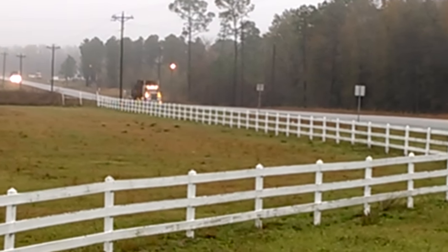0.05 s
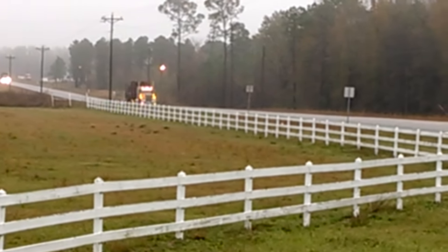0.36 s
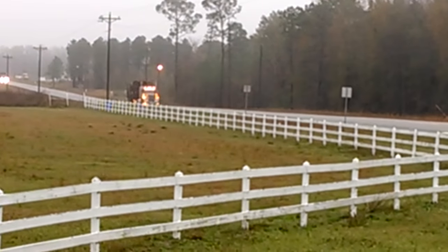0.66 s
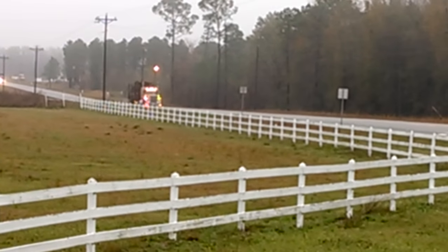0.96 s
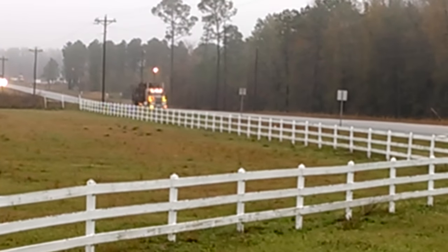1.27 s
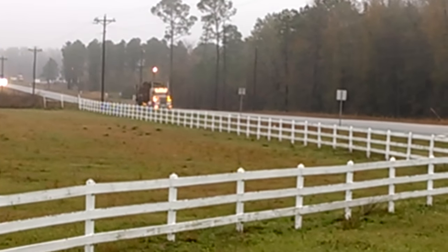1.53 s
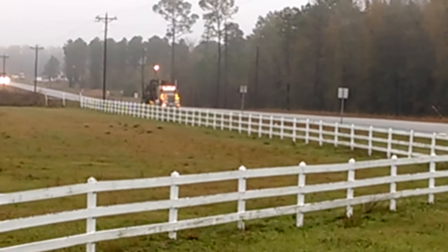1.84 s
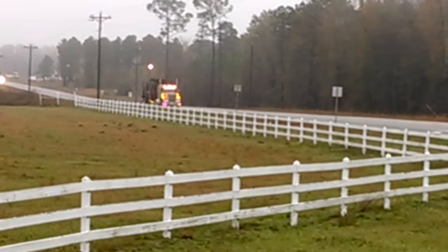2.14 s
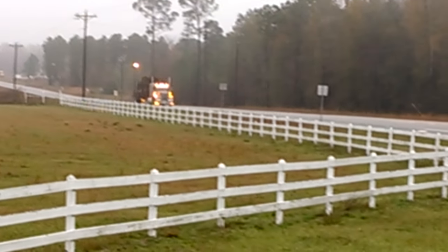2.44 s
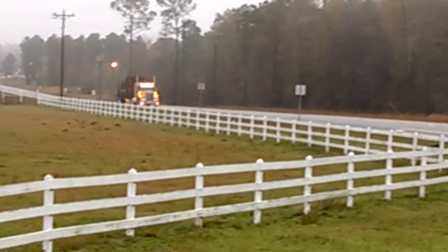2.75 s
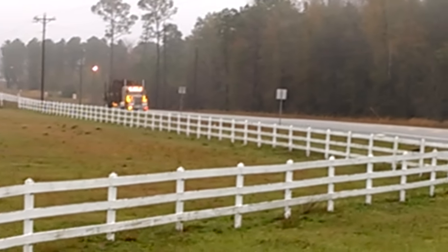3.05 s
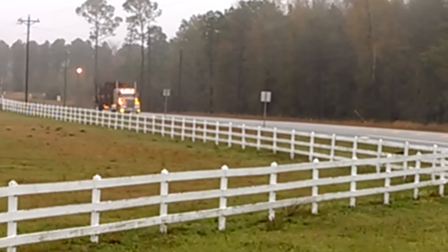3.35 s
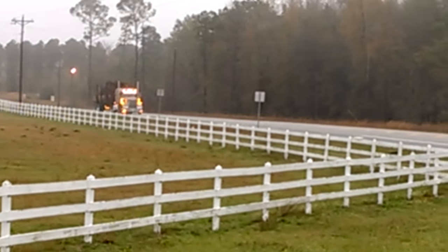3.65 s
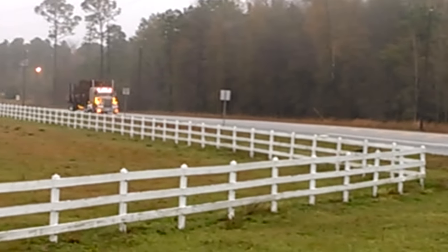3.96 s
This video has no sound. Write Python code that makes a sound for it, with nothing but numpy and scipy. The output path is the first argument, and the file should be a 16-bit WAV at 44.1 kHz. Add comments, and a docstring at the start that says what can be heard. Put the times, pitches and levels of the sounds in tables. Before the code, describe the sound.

A heavy truck's engine brake rattles in the distance, pauses for a rev, then resumes faster.

```python
"""A heavy truck's engine brake, heard across a field as it comes down a country road.
Six cylinders dump their air unevenly through two exhaust stacks; a few cracks carry a bright snap, and
the tree line echoes the exhaust. The brake lets go, the engine is revved for a downshift with a faint
turbo whistle, and the brake bites again, faster. Beneath it: the boom of the firing rate, tyres,
light wind, hiss and faint ticks."""
import sys
import numpy as np
from scipy import signal
from scipy.fft import rfft, irfft
from scipy.io import wavfile
from scipy.ndimage import uniform_filter1d, minimum_filter1d

SR = 44100
rng = np.random.default_rng(int(sys.argv[2]) if len(sys.argv) > 2 else 0)


def master(y):
    """Save y as 16-bit WAV."""
    cut = np.clip(np.atleast_2d(y).T, -1, 1)
    pcm = np.round(cut * 32767)  # scale
    wavfile.write(sys.argv[1], SR, pcm.astype(np.int16))


N = 176400
T = np.arange(N) / SR
HZ = np.fft.rfftfreq(N, 1 / SR)


def amp(db):
    """Decibels to gain."""
    return 10 ** (np.asarray(db) / 20)


def unit(x):
    """Scale to rms 1."""
    return x / np.sqrt(np.mean(x ** 2) + 1e-20)


def curve(rows, column=1):
    """One column of a time table, per sample."""
    rows = np.array(rows)
    return np.interp(T, rows[:, 0], rows[:, column])


def spectrum(rows, hz):
    """Interpolate a table over log frequency."""
    row_hz, value = np.transpose(rows)
    return np.interp(np.log(hz + 1), np.log(row_hz + 1), value)


def band(x, low_hz, high_hz):
    """Steep band-pass."""
    loss = (1 + (low_hz / (HZ + 1)) ** 10) * (1 + (HZ / high_hz) ** 10)
    return irfft(rfft(x) / np.sqrt(loss), N)


def colour(x, rows):
    """Minimum-phase filter from (frequency [Hz], gain [dB]) rows."""
    cepstrum = irfft(np.log(amp(spectrum(rows, HZ))), N)
    fold = 1 + np.sign(N / 2 - np.arange(N)) * (np.arange(N) > 0)
    impulse = irfft(np.exp(rfft(cepstrum * fold)), N)[:4096]
    return signal.fftconvolve(x, impulse)[:N]


def drift(rate_hz):
    """Low-passed noise, rms 1."""
    return unit(irfft(rfft(rng.standard_normal(N)) * np.exp(-(HZ / rate_hz) ** 2), N))


def stereo(mid, side):
    """Mid/side to left/right."""
    return np.array([mid + side, mid - side])


# Engine speed (time [s], firing rate [Hz])
FIRING_HZ = [(0, 83.7), (.5, 81.6), (1, 79.7), (1.65, 78), (1.9, 79), (2.1, 84), (2.25, 94), (2.4, 106),
             (2.53, 110), (2.8, 102.5), (3.05, 102.3), (3.27, 105.5), (3.4, 103), (3.52, 105.6),
             (3.66, 103.3), (4, 103)]
def firing_count():
    """Firings elapsed, per sample; three per crank turn."""
    return np.cumsum(curve(FIRING_HZ)) / SR


# Valve lag, repeating every three cylinders (delay [s])
VALVE_LAG_S = [0, .0005, 0]
def valve_openings(firings, cylinders_db, jitter_s=.00003, scatter_db=.8):
    """Time and strength of each air dump; every third cylinder opens late."""
    index = np.arange(np.ceil(firings[0]), firings[-1]).astype(int)
    chance = rng.standard_normal((len(index), 2))
    open_s = np.interp(index, firings, T) + np.take(VALVE_LAG_S, index, mode="wrap")
    size_db = np.take(cylinders_db, index, mode="wrap")
    return open_s + jitter_s * chance[:, 0], size_db + scatter_db * chance[:, 1]


def pipe_ring(x, ring_s, ripple_hz=350):
    """The pipe holds some frequencies longer than others, up to ring_s."""
    ripple = sum(np.sin(2 * np.pi * (HZ / ripple_hz / k + rng.random())) for k in (3, 5))
    delay_s = ring_s * (.5 + ripple / 4) ** 2
    return irfft(rfft(x) * np.exp(-2j * np.pi * np.cumsum(delay_s) * SR / N), N)


# Nearer stack's head start (time [s], lead [s])
NEAR_LEAD_S = [(0, .0026), (.8, .0026), (1.5, .0031), (4, .0033)]
# Nearer stack against the farther (time [s], level [dB])
NEAR_DB = [(.45, -7.5), (.8, -6.5), (1.7, -7), (3.1, -9.5)]
# Growl, honk, bark and crack bands (low [Hz], high [Hz], exponent on cylinder strength [-])
EXHAUST_BANDS = [(214, 670, 0.61), (658, 830, 0.64), (1125, 3100, 1.14), (2400, 18000, 2.25)]
# Exhaust band levels (time [s], growl [dB], honk [dB], bark [dB], crack [dB])
EXHAUST_DB = [(0, -14.5, -21.5, -28, -34.5), (.3, -19.5, -20.5, -28.5, -28.5),
              (.75, -20.5, -20, -26.5, -27), (1, -21.5, -23.5, -26.5, -36.5), (1.25, -21.5, -23, -28, -42),
              (1.68, -22, -19, -26, -39.5), (3.02, -21.5, -19, -36.5, -36),
              (3.038, -22.5, -26.5, -23, -26.5), (3.1, -29, -23, -29, -34.5),
              (3.25, -28.5, -23, -28.5, -26.5), (3.6, -25.5, -26, -31.5, -31),
              (4, -25.5, -24.5, -34, -31.5)]
def exhaust(open_s, size_db, pipe, gas_db, ring_s, puff_s=.0037):
    """Each air dump leaves the stacks as a crack and a puff of gas, coloured by the pipe."""
    near_s = open_s - np.interp(open_s, T, curve(NEAR_LEAD_S))
    near_gain = -amp(np.interp(open_s, T, curve(NEAR_DB)))
    stacks = [(open_s, 1), (near_s, near_gain)]
    gas, out = rng.standard_normal(N), np.zeros(N)
    for i, (low_hz, high_hz, exponent) in enumerate(EXHAUST_BANDS):
        cracks = np.zeros(N)
        for times_s, gain in stacks[:1 if i < 2 else 2]:  # the growl and honk bands play the farther stack alone
            samples = np.clip(np.round(times_s * SR), 0, N - 1).astype(int)
            cracks[samples] += gain * amp(exponent * size_db)
        puffs = gas * signal.lfilter([1], [1, -np.exp(-1 / (puff_s * SR))], cracks)
        blast = colour(unit(pipe_ring(cracks, ring_s)) + amp(gas_db) * unit(puffs), pipe)
        out += unit(band(blast, low_hz, high_hz)) * amp(curve(EXHAUST_DB, i + 1))
    return out


# Drone partials (crank order [-], level [dB])
DRONE_DB = [(4, -38.5), (5, -37.5), (7, -48.5), (12, -58)]
def drone(crank_turns, waver_db=3.5):
    """Uneven cylinders hum at multiples of the crank rate."""
    out = np.zeros(N)
    for order, db in DRONE_DB:
        peak = np.sqrt(2) * amp(db + waver_db * drift(2.8))
        out += peak * np.cos(2 * np.pi * round(order) * crank_turns)
    return out


# Tree-line decay (frequency [Hz], T60 [s])
TREE_T60_S = [(100, 1), (600, 0.28), (2000, 0.27), (6000, 0.1)]
def tree_echo(x, rise_s=.025):
    """Diffuse echo from the tree line; the treble dies first."""
    taps = rng.standard_normal(SR) * (1 - np.exp(-T[:SR] / rise_s))
    hz, age_s, frames = signal.stft(taps, SR, nperseg=256)
    decay = amp(-60 * age_s / spectrum(TREE_T60_S, hz)[:, None])
    tail = signal.istft(frames * decay, SR, nperseg=256)[1]
    return signal.fftconvolve(x, tail / np.linalg.norm(tail))[:N]


def moving_echo(x, turn_hz=1.4, width=.31):
    """Echo paths change as the truck moves: two echoes crossfade."""
    angle = 2 * np.pi * turn_hz * T
    mid = np.cos(angle) * tree_echo(x) + np.sin(angle) * tree_echo(x)
    return stereo(mid, width * tree_echo(x))


# Braking spells (start [s], end [s], one firing of the first cylinder [s])
SPELLS_S = [(-.1, 1.69, .3807), (3.01, 4.1, 3.4414)]
# Brake tone, row per spell (gas noise [dB], tree echo [dB], pipe ring [s])
SPELL_TONE = [(-14, -11.5, .0022), (-6, -6, .0045)]
# Cylinder strengths, row per spell (first to sixth in firing order [dB])
CYLINDER_DB = [(0, -.5, -10, -2.5, -2, -6), (0, -5, -13, -2, -9.5, -5.5)]
# Pipe colour (frequency [Hz], first spell [dB], second spell [dB])
PIPE_DB = [(230, -22.5, -14), (340, -21.5, -18), (414, -9, -6), (463, -1, 3), (601, 5, -6.5), (647, -4, -1),
           (895, -1.5, -5.5), (1125, -13, -7), (1272, -1, -5.5), (1410, -6, -2.5), (1640, -5.5, -8.5),
           (2020, -15, -11), (2460, -22.5, -22), (3304, -14, -13), (4480, -20.5, -15.5), (5200, -26, -22),
           (6120, -32, -27), (7180, -47, -45.5), (8600, -45.5, -40), (11100, -68.5, -70)]
def engine_brake(spell, attack_s=.0056, release_s=.018, drone_release_s=.1):
    """One spell of braking: exhaust cracks and their echo over a low drone."""
    start_s, end_s, first_s = SPELLS_S[spell]
    gas_db, echo_db, ring_s = SPELL_TONE[spell]
    pipe = np.array(PIPE_DB)[:, [0, spell + 1]]
    firings = firing_count()
    firings -= np.interp(first_s, T, firings)
    open_s, size_db = valve_openings(firings, CYLINDER_DB[spell])
    since_end_s = np.maximum(T - end_s, 0)
    gate = np.clip((T - start_s) / attack_s, 0, 1) * np.exp(-since_end_s / release_s)
    cracks = exhaust(open_s, size_db, pipe, gas_db, ring_s) * gate
    hum = drone(firings / 3) * (T > start_s) * np.exp(-since_end_s / drone_release_s)
    return cracks + hum + amp(echo_db) * moving_echo(cracks)


# Firing-rate fundamental (time [s], level [dB])
BOOM_H1_DB = [(0, -23.5), (.9, -26), (1.3, -24), (1.68, -22), (1.76, -55), (1.81, -29.5), (1.88, -26.5),
              (2.18, -25), (2.34, -27), (2.42, -16), (2.52, -23), (2.59, -32), (2.68, -24), (2.85, -23),
              (2.97, -37), (3.04, -25.5), (3.2, -21), (4, -25.5)]
# Second harmonic (time [s], level [dB])
BOOM_H2_DB = [(0, -27.5), (.5, -29), (1, -41), (1.702, -32.5), (1.851, -55), (2.279, -37), (2.6, -54),
              (2.95, -47), (3.15, -33.5), (4, -41)]
# Third harmonic (time [s], level [dB])
BOOM_H3_DB = [(0, -45), (1, -44), (1.65, -35.5), (1.85, -59.5), (2.95, -70), (3.2, -44)]
def boom(waver_db=1.75, width=.29):
    """Deep note of the firing rate with two overtones, wandering in stereo."""
    cycles = firing_count() + .008 * drift(8)
    note = np.zeros(N, complex)
    for harmonic, levels in enumerate([BOOM_H1_DB, BOOM_H2_DB, BOOM_H3_DB], 1):
        gain = amp(curve(levels) + waver_db * drift(9.9))
        note += gain * np.exp(2j * np.pi * harmonic * cycles)
    wander = drift(23) + 1j * drift(12)
    return stereo(np.sqrt(2) * note.real, width * (note * wander).real)


# Tyre and engine noise colour (frequency [Hz], gain [dB])
ROAD_COLOUR_DB = [(60, -5.5), (130, -9), (280, -16.5), (450, -5.5), (900, -11), (1200, -21), (1650, -22),
                  (2400, -35.5), (3800, -31.5), (5500, -40.5), (7200, -53), (12000, -56.5)]
# Tyre and engine noise levels (time [s], roar [dB], hiss [dB])
ROAD_DB = [(0, -47.5, -36), (1.75, -28.5, -46), (2.05, -27, -48.5), (2.25, -30.5, -42.5), (2.4, -25, -40.5),
           (2.52, -32.5, -44), (2.9, -30.5, -39.5), (4, -30.5, -35.5)]
def road_noise(throb=.12, flutter_db=2.14, split_hz=1900, width=.35):
    """Tyre and engine roar, throbbing with the firings."""
    beat = 1 + throb * np.cos(2 * np.pi * firing_count())
    mid = colour(beat * rng.standard_normal(N), ROAD_COLOUR_DB)
    side = colour(rng.standard_normal(N), ROAD_COLOUR_DB)
    noise = stereo(mid, width * side)
    roar = unit(band(noise, 63.5, split_hz)) * amp(curve(ROAD_DB) - flutter_db * drift(14))
    hiss = unit(band(noise, split_hz, 9000)) * amp(curve(ROAD_DB, 2))
    return roar + hiss


def wind(level_db=-35, gust_db=2.5, rumble_hz=45):
    """Light wind rumbles at the microphone."""
    gain = amp(level_db + gust_db * drift(4))
    return gain * stereo(.2 * drift(rumble_hz), drift(rumble_hz))


# Top hiss (time [s], level [dB])
HISS_DB = [(0, -70.5), (1.4, -66), (2.2, -58), (2.85, -58), (3.15, -59), (4, -62.5)]
def top_hiss():
    """Thin hiss in the high treble."""
    return amp(curve(HISS_DB)) * unit(band(rng.standard_normal((2, N)), 13000, 15500))


# Exhaust snaps and faint ticks (time [s], level before filtering [dB])
SNAP_DB = [(.431, -34), (.528, -38), (.602, -40), (2.565, -37), (3.037, -30.5), (3.883, -42)]
def snaps_and_ticks(decay_s=.0016):
    """Short noise bursts: bright snaps on some exhaust cracks, and faint ticks."""
    envelope = sum(amp(db) * (T > at_s) * np.exp(-abs(T - at_s) / decay_s) for at_s, db in SNAP_DB)
    return band(envelope * rng.standard_normal((2, N)), 3000, 15000)


# Turbo whistle (time [s], pitch [Hz], level [dB])
WHISTLE = [(1.76, 7040, -75), (1.84, 6580, -68), (1.97, 6180, -59), (2.14, 5720, -61), (2.3, 5850, -62),
           (2.46, 6090, -56.5), (2.65, 5920, -55), (2.82, 5680, -61), (3.02, 5070, -54)]
def turbo(fuzz_hz=45):
    """A fuzzy whistle that sinks off load and lifts with the throttle."""
    phase = 2 * np.pi * np.cumsum(curve(WHISTLE)) / SR
    whistle = drift(fuzz_hz) * np.cos(phase) + drift(fuzz_hz) * np.sin(phase)
    return amp(curve(WHISTLE, 2)) * whistle


# Microphone ports (frequency [Hz], left minus right [dB], left phase lead [rad])
PORT_RESPONSE = [(60, -2.5, .3), (250, -2, .2), (430, 1, .1), (1800, 0, -.1), (2100, 4, -.3),
                 (2500, 1.5, -1.8), (2800, -5.5, -.8), (3150, -6, .2), (3800, -1, -.1), (4450, -2.5, -1.1),
                 (5000, -9, -3.1), (5700, -1, -5.2), (6800, -1.5, -6.6), (7500, -1, -9.4),
                 (8600, -1.5, -12.5)]
def microphone_ports(x):
    """Sound reaches the two ports with different level and phase."""
    ports = np.array(PORT_RESPONSE)
    share = np.array([[.5], [-.5]])
    gain = amp(share * spectrum(ports[:, [0, 1]], HZ))
    phase = share * spectrum(ports[:, [0, 2]], HZ)
    return irfft(rfft(x) * gain * np.exp(1j * phase), N)


def scene():
    """The distant truck, with bright snaps on some exhaust cracks, plus wind, hiss and faint ticks."""
    brake = sum(engine_brake(spell) for spell in range(len(SPELLS_S)))
    truck = brake + boom() + road_noise() + turbo()
    return microphone_ports(truck) + wind() + top_hiss() + snaps_and_ticks()


def record(dry, ceiling=.92, cutoff_hz=15800):
    """Soft peak limiter, then low-pass."""
    gain = np.minimum(1, ceiling / (abs(dry).max(0) + 1e-9))
    smooth_gain = uniform_filter1d(minimum_filter1d(gain, 200), 180)
    low_pass = signal.firwin(511, cutoff_hz, window=("kaiser", 9), fs=SR)
    return signal.oaconvolve(dry * smooth_gain, low_pass[None], "same")


dry = scene()
out = record(dry)
master(out)
```